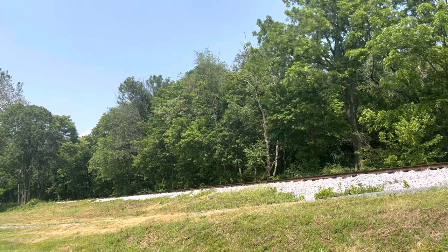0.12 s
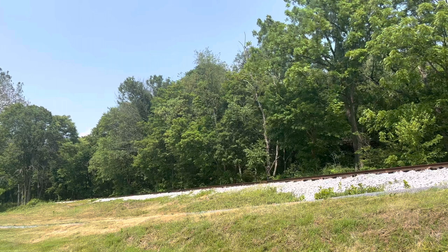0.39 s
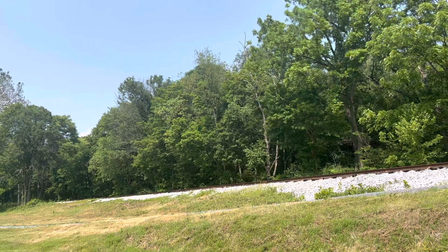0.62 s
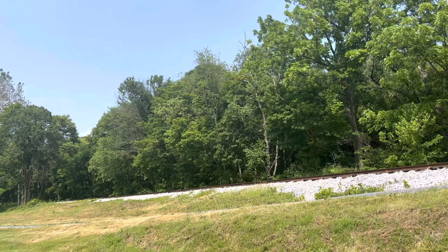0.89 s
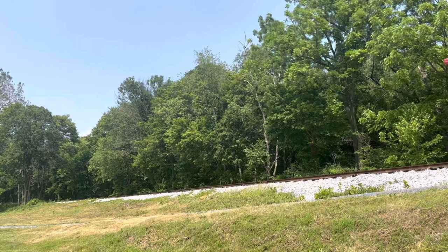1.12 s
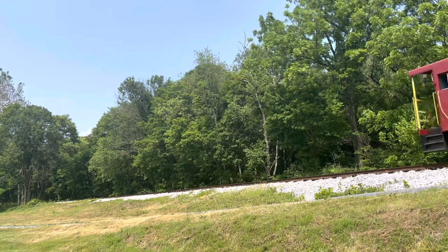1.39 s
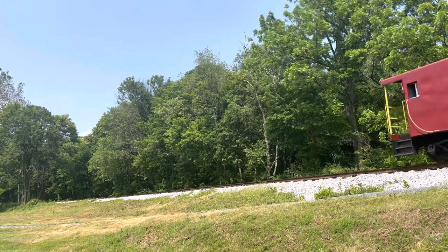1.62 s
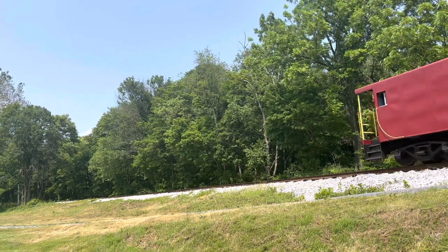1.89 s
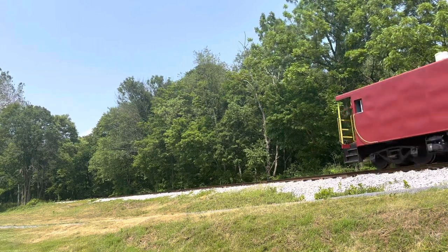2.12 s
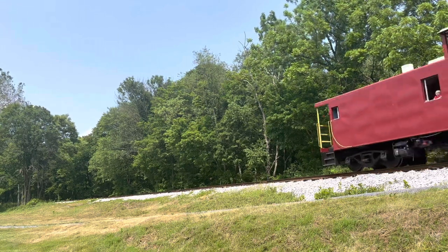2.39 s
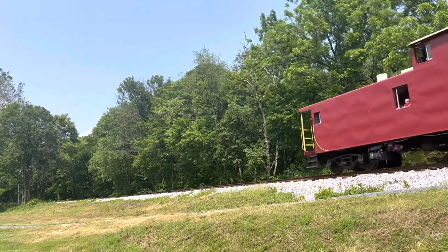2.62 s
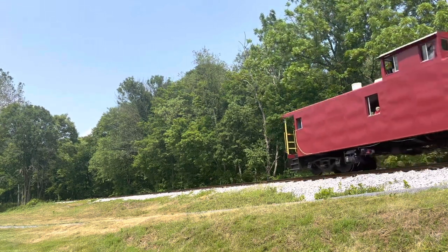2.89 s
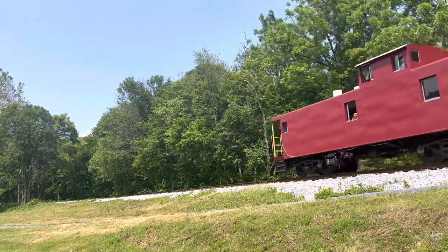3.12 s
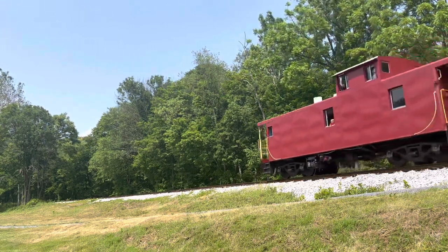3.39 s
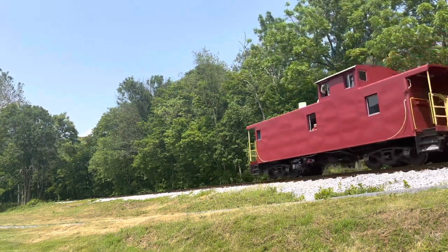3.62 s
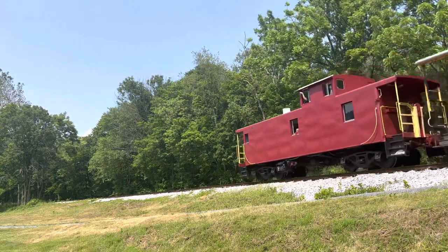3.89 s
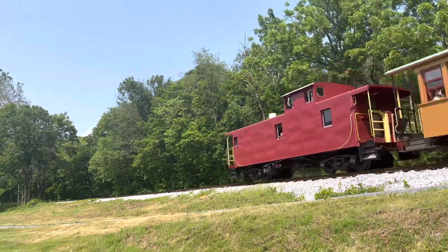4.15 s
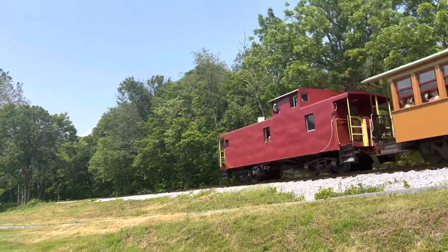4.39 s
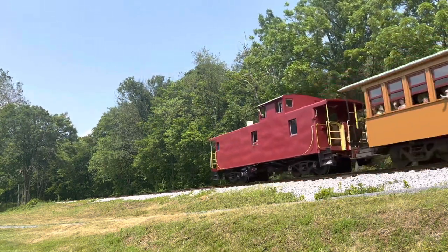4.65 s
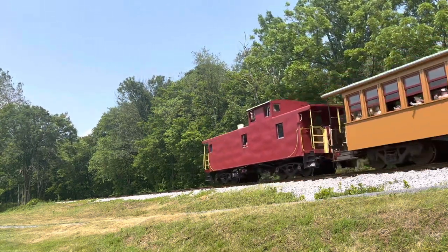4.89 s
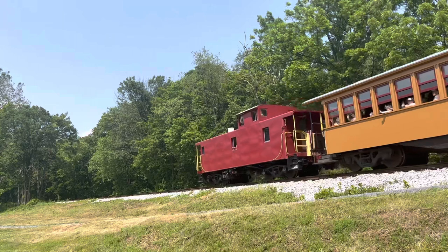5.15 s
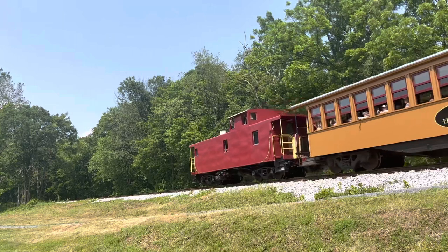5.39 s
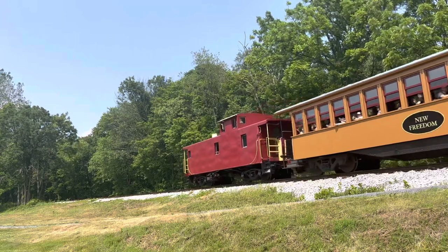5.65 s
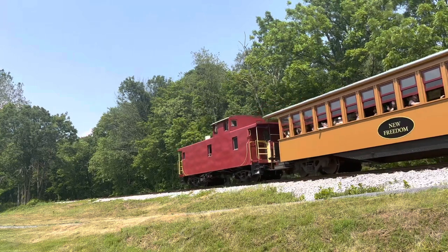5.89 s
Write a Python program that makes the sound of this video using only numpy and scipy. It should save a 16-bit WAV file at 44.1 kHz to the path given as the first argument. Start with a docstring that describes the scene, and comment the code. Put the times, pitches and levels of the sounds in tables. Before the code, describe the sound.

A slow train of wooden cars passes in an open field, captured by two spaced microphones with little echo. From the start there is deep rumble, a hollow body drone and grainy rail hiss, surging roughly every half second and gradually growing. Clacks with brief metallic clatter fall at about 0.2, 0.5, 1.3-1.4, 1.7, 2.2, 2.7, 3.1, 3.5, 3.9, 4.3, 4.7, 5.1, 5.4 and 5.8 s, ringing the wheels. Dull slack-gear thuds come at 0.5, cluster between 2.6 and 4.2, and return near 5 s. Loose parts clink throughout. Short wavering steel squeaks chirp around 1.8, 2.4, 4.3 and 4.8 s, with longer faint ones after 5.4. A thin throbbing squeal near 4.5 kHz, mostly left, is faint at first, rises after 2.7, is strongest around 3.6-5.2, dips near 5.3, then returns unsteadily. The rolling continues to the end at 6 s.

```python
"""Wheels and car bodies rumble as a short train of wooden cars rolls slowly past on jointed track.
Rolling is shaped noise with surges; rail joints excite damped clacks, noise clatter and wheel modes.
Slack gear thuds as noise-driven resonances, rubbing steel squeaks in wavering tones, loose parts clink.
A thin throbbing squeal, a tone with fainter tones above it, hangs on the left in a band of hiss.
Two spaced microphones in an open field hear the train from the right."""
import sys
import numpy as np
from scipy import signal
from scipy.fft import rfft, irfft, next_fast_len
from scipy.io import wavfile

SR = 44100
rng = np.random.default_rng(int(sys.argv[2]) if len(sys.argv) > 2 else 0)


def log_audio(samples):
    """Write samples as a 16-bit WAV file to the path given in sys.argv[1]."""
    # one column per channel
    frames = np.atleast_2d(samples).T
    # limit to full scale, then quantise
    limited = np.clip(frames, -1, 1)
    pcm = np.round(limited * 32767).astype(np.int16)
    wavfile.write(sys.argv[1], SR, pcm)


def convert_level_to_amplitude(level_db):
    """Map a level in decibels to its linear amplitude factor."""
    exponent = np.asarray(level_db, float) / 20
    return 10 ** exponent


N = 265482  # samples


def columns(rows):
    """Table columns as arrays."""
    return np.transpose(np.array(rows, float))


def in_time(rows):
    """Linear interpolation of a table's curves at every sample."""
    s, *curves = columns(rows)
    return [np.interp(np.arange(N) / SR, s, curve) for curve in curves]


def at_hz(points, hz):
    """A spectrum interpolated on a log-frequency axis."""
    point_hz, value = columns(points)
    return np.interp(np.log(hz), np.log(point_hz), value)


def rms_one(x):
    """Normalisation to unit rms."""
    return x / np.sqrt(np.mean(x ** 2) + 1e-20)


def drift(rate_hz):
    """Low-pass random process of unit rms: noise through a double pole, drawn every 40 samples."""
    r = np.exp(-80 * np.pi * rate_hz / SR)
    white = rng.standard_normal(N // 40 + 2002)
    slow = signal.lfilter([1], [1, -2 * r, r * r], white)[2000:]   # the filter has settled
    return np.interp(np.arange(N) / 40, np.arange(len(slow)), rms_one(slow))


def ring(force, hz, t60_s):
    """Damped resonator: a unit impulse starts a decaying sine of initial height about 1."""
    r = convert_level_to_amplitude(-60 / (t60_s * SR))
    w = 2 * np.pi * hz / SR
    return signal.lfilter([0, np.sin(w)], [1, -2 * r * np.cos(w), r * r], force + 1e-18)


def third_octaves():
    """Third-octave filtering of white noise, two unrelated draws: direct path and scattered paths."""
    edges = 22 * 2 ** (np.arange(30) / 3)
    white = rng.standard_normal((2, 2, N))
    for k, (low, high) in enumerate(zip(edges, edges[1:])):
        sos = signal.butter(2, [low, high], "band", fs=SR, output="sos")
        yield np.sqrt(low * high), signal.sosfilt(sos, white[k % 2])   # neighbours use unlike noise


# rumble surges, about once per wheel turn, as from a tread out of round:
# peak_s, deep_rumble_rise_db, body_drone_rise_db
SURGES = [(0.03, 4.5, -0.5), (0.58, 7, 9), (1.13, 9, 5), (1.73, 7, 2.5), (2.28, 8.5, 8.5), (2.9, 5, 7),
          (3.1, 3.5, 3), (3.54, 4.5, 8.5), (4.14, 5.5, 2), (4.82, 4.5, 4.5), (5.46, 3, 5), (5.72, 0.5, 0)]
SURGE_RISE_S, SURGE_FALL_S = 0.13, 0.2


def surges(rises_db, late_s):
    """Periodic excitation by an uneven tread: each level surge is a skewed Gaussian, slower to ebb."""
    age = np.arange(N) / SR - columns(SURGES)[0][:, None] - late_s
    width_s = np.where(age < 0, SURGE_RISE_S, SURGE_FALL_S)
    return rises_db @ np.exp(-(age / width_s) ** 2)


# rolling levels before the surges, louder as the cars draw level: time_s, body_drone_db, rail_hiss_db
ROLLING_LEVELS = [(0.0, -28, -38.5), (0.35, -32, -42), (0.67, -37.5, -40.5), (0.87, -33, -41),
                  (1.76, -27, -39.5), (2.09, -28.5, -40), (2.33, -32, -39), (2.67, -27, -37),
                  (2.84, -34.5, -38.5), (2.89, -30, -37.5), (3.02, -30, -38), (3.27, -31, -39.5),
                  (3.74, -29, -36.5), (4.31, -25.5, -34), (4.51, -28.5, -34.5), (4.65, -29.5, -37.5),
                  (5.08, -25, -35.5), (5.2, -22.5, -36), (5.29, -29, -37), (5.4, -27.5, -35.5),
                  (6.02, -26.5, -35)]
DEEP_START_DB, DEEP_GROWTH_DB_PER_S = -32, 1.01   # deep rumble between surges
DEEP_LATE_S = 0.013     # the deep surge follows the drone's
HISS_FOLLOWS = 0.24     # share of the drone's surge, in dB, that the hiss takes


def rolling_db():
    """Common excitation: rumble, drone and hiss levels in dB share the timing of the surges."""
    body_db, hiss_db = in_time(ROLLING_LEVELS)
    _, deep_rise_db, body_rise_db = columns(SURGES)
    body_surge_db = surges(body_rise_db, 0)
    deep_db = DEEP_START_DB + DEEP_GROWTH_DB_PER_S * np.arange(N) / SR + surges(deep_rise_db, DEEP_LATE_S)
    return deep_db, body_db + body_surge_db, hiss_db + HISS_FOLLOWS * body_surge_db


# rolling noise spectrum, relative within each part: frequency_hz, density_db (per Hz)
ROLLING_SPECTRUM = [(25, -32), (45, -2), (60, -4), (120, -7.5), (300, -2), (450, -11), (700, -14.5),
                    (1050, -13), (1400, -22), (2200, -18.5), (2800, -22), (3500, -24), (4500, -23),
                    (5600, -28.5), (6800, -33.5), (8200, -45), (12000, -46), (15000, -76)]
# grind of wheel on rail: time_s, finest_hiss_db, rail_hiss_brightness_db_per_octave
GRIND = [(0.0, -62, 2), (0.47, -65, 2), (1.41, -61, 1), (2.33, -61.5, 0.5), (3.0, -59.5, 1.5),
         (3.4, -62, 1), (3.66, -59, 1), (4.21, -57, 0), (4.81, -63.5, 1), (5.78, -57.5, 1),
         (6.02, -51.5, 4)]


def rolling(bands, deep_db, body_db, hiss_db):
    """Roughness excitation: deep rumble, body drone, rail hiss and finest hiss, as wavering noise bands."""
    parts = np.zeros((4, 2, N))
    finest_db, bright_db = in_time(GRIND)
    for hz, noise in bands:
        part = np.searchsorted([150, 575, 8000], hz)   # limits between the four parts, Hz
        tilt_db = bright_db * np.log2(hz / 2000) * (part == 2)
        waver_db = (1.4 if part > 1 else 1.0) * drift(5.8)   # each band swells alone
        parts[part] += noise * convert_level_to_amplitude(at_hz(ROLLING_SPECTRUM, hz) + tilt_db + waver_db)
    levels_db = [deep_db, body_db, hiss_db, finest_db]
    return sum(convert_level_to_amplitude(db) * rms_one(part) for db, part in zip(levels_db, parts))


# wheel and rail modes: pitch_hz (before tuning), relative_level_db, t60_s
WHEEL_MODES = [(960, -13, 0.24), (1150, -2, 0.072), (1618, 4.5, 0.021), (1690, -5, 0.095),
               (2000, -9, 0.056), (2140, -2, 0.041), (2400, -14.5, 0.1), (2680, -5, 0.12),
               (3000, -32, 0.056), (3040, -9, 0.035), (4150, -12, 0.06), (6220, -10, 0.05)]


def wheels(shaking, tuning, rattles_per_s=500.0, ring_db=-20.5, swell_db=3.5):
    """Modal synthesis: random impulses excite the wheel's damped modes, each swelling on its own."""
    hits = rng.random((2, N)) < rattles_per_s / SR
    rattles = hits * rng.standard_normal((2, N)) * shaking
    out = np.zeros((2, N))
    for hz, db, t60_s in WHEEL_MODES:
        level_db = db + ring_db + swell_db * drift(13.0)
        out += ring(rattles * convert_level_to_amplitude(level_db), tuning * hz, t60_s)
    return out


# wheels over rail joints:
# start_s, clatter_level_db (relative), treble_db_per_octave, first_clack_db, clack_pitch_hz
JOINTS = [(0.168, -16, -5.5, -25, 1090), (0.416, -31, -11, -31, 890), (0.533, -17.5, -11, -30, 975),
          (1.293, -17, -4.5, -25, 884), (1.402, -16, -6.5, -20.5, 960), (1.437, -32, -6, -25, 910),
          (1.664, -11.5, -3.5, -30, 1690), (1.697, -26, -6, -34, 1000), (1.725, -32, -3, -42, 1050),
          (1.784, -23, -12, -22.5, 990), (2.194, -24, -7, -32, 960), (2.702, -11, -4, -30, 1630),
          (3.084, -10.5, -5, -20.5, 800), (3.471, -18.5, -3, -18.5, 960), (3.864, -21, -14, -23, 890),
          (3.907, -18, -3.5, -26, 1710), (3.988, -21, -13, -22.5, 1250), (4.293, -11, -2.5, -27, 1690),
          (4.393, -12.5, -7, -28, 855), (4.711, -26, 2, -19.5, 870), (5.093, -21, -6, -27, 900),
          (5.384, -13, -3, -29, 1060), (5.791, -10, -3.5, -32, 1740)]
# the joint crossed in each of those rows: far right, near right or straight ahead
CROSSED = "far far far near far far near near near far near near near far far ahead far ahead far far far ahead ahead".split()
# how each joint is struck: rise_time_constant_s, clatter_hold_s, wheel_pitch_factor
STRUCK = {"far": (.0008, .018, 1), "near": (.0008, .013, .985), "ahead": (.007, .027, 1.01)}
# clatter spectrum: frequency_hz, relative_density_db (per Hz)
CLATTER_SPECTRUM = [(70, -24), (200, -6), (500, -9.5), (1000, -17.5), (2000, -11), (3500, -12), (6500, -18),
                    (8200, -33), (12000, -11.5), (15000, -59)]
# clatter decay: frequency_hz, t60_s
CLATTER_DECAY = [(300, 0.12), (2000, 0.18), (6000, 0.1), (12000, 0.16)]
# partials of a clack: pitch_ratio, t60_s
CLACK_PARTIALS = [(1, .03), (1.346, .02), (1.626, .02), (1.95, .015), (0.581, .04)]
BOUNCE_MEAN_S, BOUNCE_LOSS_DB = 0.006, 5   # the tread strikes three times, unevenly
FRONT_DB, FRONT_S = 4.5, .003   # a hard blow starts with a crack: boost and its time constant
TILT_FROM_HZ = 600   # the treble slope is held constant below this


def joints(bands, noise_db=1.5):
    """Impact excitation: damped clacks, then clatter decaying band by band, ring the wheel; a track a joint."""
    out = {joint: np.zeros((2, N)) for joint in STRUCK}
    shaking = {joint: np.zeros(N) for joint in STRUCK}
    t = np.arange(N) / SR
    colour_db = rng.normal(0, 1.8, (len(JOINTS), len(bands)))   # every wheel sounds a little different
    gaps_s = BOUNCE_MEAN_S * rng.uniform(.6, 1.4, (len(JOINTS), 3))
    grain_db = [3.5 * drift(170.0) for _ in range(3)]
    for row, joint, tints_db, gap_s in zip(JOINTS, CROSSED, colour_db, gaps_s):
        s, db, treble_db, clack_db, clack_hz = row
        rise_s, hold_s, _ = STRUCK[joint]
        at = slice(int(s * SR), int((s + .3) * SR))
        age = t[at] - t[at][0]
        rise = (1 - np.exp(-age / rise_s)) * convert_level_to_amplitude(FRONT_DB * np.exp(-age / FRONT_S))
        after = np.maximum(age - hold_s, 0)
        shaking[joint][at] += convert_level_to_amplitude(db) * rise * np.exp(-after / .006)
        for ratio, t60_s in CLACK_PARTIALS:   # the tread meets the rail end
            for k, late_s in enumerate(np.cumsum(gap_s) - gap_s[0]):
                since = np.maximum(age - late_s, 0)
                envelope = (1 - np.exp(-since / rise_s)) * convert_level_to_amplitude(-60 * since / t60_s)
                strike = envelope * np.sin(2 * np.pi * ratio * clack_hz * since)
                out[joint][:, at] += convert_level_to_amplitude(clack_db - BOUNCE_LOSS_DB * k) * strike
        for k, ((hz, noise), tint_db) in enumerate(zip(bands, tints_db)):
            tilt_db = treble_db * np.log2(max(hz, TILT_FROM_HZ) / 1500)
            level_db = db + noise_db + at_hz(CLATTER_SPECTRUM, hz) + tint_db + tilt_db
            grainy_db = grain_db[k // 3 % 3][at]   # neighbouring octaves break up differently
            decay_db = -60 * after / at_hz(CLATTER_DECAY, hz)
            out[joint][:, at] += noise[:, at] * rise * convert_level_to_amplitude(level_db + grainy_db + decay_db)
    for joint, (_, _, tuning) in STRUCK.items():
        out[joint] += wheels(shaking[joint], tuning, rattles_per_s=1500.0, ring_db=-30.0)
    return out


# slack couplers and trucks thudding: start_s, level_db (relative), pitch_hz
THUDS = [(0.536, -22, 305), (2.584, -23.5, 400), (2.868, -24, 279), (2.972, -22.5, 198),
         (3.388, -27.5, 406), (3.545, -24, 240), (3.774, -26.5, 389), (4.16, -25, 220), (4.953, -26, 470),
         (5.338, -25.5, 393)]


def thuds(t60_s=0.077, push_s=0.031):
    """Forced resonance: a short noisy push drives a low body mode and a weaker one above it."""
    out = np.zeros((2, N))
    age = np.arange(int(0.013 * SR)) / SR
    pushes = rng.standard_normal((len(THUDS), 2, len(age)))
    for (s, db, hz), push in zip(THUDS, pushes):
        force, i = np.zeros((2, int(.3 * SR))), int(s * SR)
        force[:, :len(age)] = push * np.exp(-age / push_s)
        thud = ring(force, hz, t60_s) + 0.5 * ring(force, 1.277 * hz, 2.0 * t60_s)
        peak = np.abs(thud).max(axis=1, keepdims=True)
        out[:, i:i + force.shape[1]] += convert_level_to_amplitude(db + 10.5) * thud / peak
    return out


# squeaks of rubbing steel:
# start_s, level_db (before flutter), pitch_hz (before wavering), length_s, second_harmonic_db (to the first)
SQUEAKS = [(0.328, -52.5, 2640, 0.2, -28), (0.77, -50, 3290, .08, -30), (0.54, -47, 5400, 0.073, -27),
           (1.72, -43, 1900, 0.081, -28), (1.8, -46, 3610, 0.029, -30), (1.802, -33.5, 1737, 0.038, -17),
           (1.953, -48, 3620, 0.046, -21), (1.98, -46, 1650, 0.049, -28), (2.15, -40, 1845, 0.033, -37),
           (2.22, -43.5, 1460, 0.068, -37), (2.27, -46, 3170, 0.054, -30), (2.305, -39.5, 2100, .04, -30),
           (2.372, -51, 2400, .03, -28), (2.428, -33.5, 2373, 0.096, -3.5), (2.47, -35, 2150, 0.043, -6),
           (3.605, -42.5, 3800, 0.045, -30), (3.915, -39, 2670, 0.039, -30), (4.314, -34, 2990, 0.053, -32),
           (4.34, -37, 2700, 0.053, -30), (4.57, -40, 1840, 0.08, 0), (4.755, -40, 2080, 0.11, -32),
           (4.82, -35.5, 1860, 0.042, -13), (4.75, -31.5, 1117, 0.041, -28), (5.22, -42, 2520, 0.027, -32),
           (5.39, -50, 6780, 0.13, -23), (5.429, -41, 2680, 0.12, -30), (5.5, -47, 2440, 0.22, -30),
           (5.647, -49, 7140, 0.29, -28), (5.827, -38, 2760, 0.072, -24)]
SQUEAK_WAVER = 0.007   # rms share of the pitch


def squeaks(joint, flutter_db=3.2, rasp=.45):
    """Stick-slip friction: tones of fast-wavering pitch and strength, from the truck last over this joint."""
    out, t = np.zeros((2, N)), np.arange(N) / SR
    wander = drift(130.0)
    flutter = convert_level_to_amplitude(flutter_db * drift(70.0)) * (1 + rasp * drift(300.0))
    joint_s = columns(JOINTS)[0]
    for s, db, hz, length_s, second_db in SQUEAKS:
        if CROSSED[np.searchsorted(joint_s, s) - 1] != joint:
            continue
        at = slice(int(s * SR), int((s + length_s) * SR))
        phase = 2 * np.pi * hz * np.cumsum(1 + SQUEAK_WAVER * wander[at]) / SR
        swell = np.sin(np.pi * np.clip((t[at] - s) / length_s, 0, 1) ** 0.6) ** 0.4
        tone = np.sin(phase) + convert_level_to_amplitude(second_db) * np.sin(2 * phase)
        out[:, at] += convert_level_to_amplitude(db) * swell * flutter[at] * tone
    return out


def loose_gear(hiss_db):
    """Sustained modal excitation: loose gear never rests, and its rattling follows the rail hiss."""
    return wheels(convert_level_to_amplitude(hiss_db + 0.5 + 3.7 * drift(28.0)), 1)


def rattle(hiss_db, per_s=260.0, below_hiss_db=2.0, cycles=65.0):
    """Random impacts in clumps: small loose parts clink, each a damped resonance losing 60 dB in 65 cycles."""
    strengths_db = 4.0 * np.minimum(rng.exponential(1, (2, N)), 3.3)
    sizes = convert_level_to_amplitude(strengths_db) * rng.choice([-1, 1], (2, N))
    struck = rng.random((2, N)) < per_s * convert_level_to_amplitude(5.0 * drift(6.0)) / SR
    pitches_hz = np.geomspace(750, 3100, 30) * rng.uniform(.97, 1.03, 30)
    dealt = rng.integers(0, 30, N)   # which pitch a clink takes
    clinks = np.zeros((2, N))
    for k, hz in enumerate(pitches_hz):
        clinks += ring(sizes * struck * (dealt == k), hz, cycles / hz) * (1500 / hz)
    return convert_level_to_amplitude(hiss_db - below_hiss_db) * rms_one(clinks)


# the thin squeal: time_s, level_db (before flutter and panning)
SQUEAL_LEVELS = [(0, -56), (.38, -52), (.45, -47), (.65, -46), (.86, -52), (.92, -45), (1.1, -47),
                 (1.35, -45), (1.43, -54), (2.1, -56), (2.2, -46), (2.45, -42), (2.65, -44), (2.75, -39),
                 (2.95, -39), (3.15, -36), (3.33, -43), (3.39, -38), (3.52, -38), (3.6, -33), (3.85, -31.5),
                 (4.05, -32), (4.1, -38), (4.22, -37), (4.28, -44), (4.5, -39), (4.62, -33), (4.8, -31.5),
                 (4.93, -36), (5, -31.5), (5.13, -31), (5.18, -35), (5.28, -37), (5.34, -46), (5.5, -42),
                 (5.6, -33.5), (5.75, -36.5), (5.86, -44), (5.95, -38), (6.02, -35)]
# squeal in the stereo pair: time_s, left_lag_radians
SQUEAL_LAG = [(0, .5), (1.8, .8), (2.8, 2.2), (6.02, 3.4)]
# fainter tones above the squeal: throb_rate_multiple, level_db (to the main tone)
THROB_TONES = [(1, -16), (2, -13), (4, -19)]
SQUEAL_HZ, THROB_HZ, RIGHT_BELOW_LEFT_DB = 4533.5, 62.8, 11.5


def squeal(waver_hz=1.5, flutter_db=1.3):
    """Beating: a nearly pure tone throbs against fainter tones above it, much stronger on the left."""
    phase = 2 * np.pi * np.cumsum(SQUEAL_HZ + waver_hz * drift(10.8)) / SR
    beat = 2 * np.pi * np.cumsum(THROB_HZ + 0.98 * drift(0.735)) / SR
    sides = np.array([phase - in_time(SQUEAL_LAG)[0], phase])
    tone = np.sin(sides) + sum(convert_level_to_amplitude(db) * np.sin(sides + k * beat) for k, db in THROB_TONES)
    level = convert_level_to_amplitude(in_time(SQUEAL_LEVELS)[0] + flutter_db * drift(25.0))
    return level * tone * convert_level_to_amplitude(np.array([[0], [-RIGHT_BELOW_LEFT_DB]]))


HALO_HZ, HALO_POLE_WIDTH_HZ, HALO_MEAN_DB = 4570, 510, -49.5
HALO_FOLLOWS = 0.88   # share of the rail hiss's swing, in dB


def halo(hiss_db, flutter_db=3.5):
    """Resonant filtering: noise twice through one resonance gives a flickering hiss about the squeal's pitch."""
    t60_s = np.log(1000) / (np.pi * HALO_POLE_WIDTH_HZ)
    once = ring(rng.standard_normal((2, N)), HALO_HZ, t60_s)
    band = ring(once, HALO_HZ, t60_s)
    swing_db = HALO_FOLLOWS * (hiss_db - hiss_db.mean())
    return convert_level_to_amplitude(HALO_MEAN_DB + swing_db + flutter_db * drift(6.2)) * rms_one(band)


def stereo_pair(paths, image):
    """Interchannel coherence: the left is the right's direct path, phase-lagged, weighted and mixed with scatter."""
    size = next_fast_len(N + 4096)
    hz, *curves = columns(image)
    bins_hz = np.arange(size // 2 + 1) * SR / size
    lag, alike, pan_db = [np.interp(bins_hz, hz, curve) for curve in curves]
    alike = np.clip(alike, 0, 1)
    direct, scattered = rfft(paths, size)
    left = alike * direct * np.exp(-1j * lag) + np.sqrt(1 - alike ** 2) * scattered
    pair = np.array([left * convert_level_to_amplitude(pan_db / 2), direct * convert_level_to_amplitude(-pan_db / 2)])
    return irfft(pair, size)[:, :N]


# the train in the stereo pair, spaced-microphone lag below about 7 kHz, a stepped treble phase above:
# frequency_hz, left_lag_radians, likeness (0-1), left_minus_right_db
TRAIN_IMAGE = [(0, 0, .995, 1.3), (250, 1.1, .97, 0), (520, 2.4, .92, -1), (660, 3.1, .85, -3.5),
               (800, 3.3, .72, -6), (1120, 2.4, .65, -5), (1400, 2.9, .7, -5), (2000, 6.5, .5, -3),
               (3400, 5, .25, 0), (4900, 11, .25, 3), (6500, 7.2, .5, -4), (7200, 9.2, .3, -2),
               (7600, 9.42, .92, 0), (8600, 9.42, .85, 0), (9000, 10.6, .4, 0), (10300, 11.5, .5, 0),
               (10900, 12.57, .98, 0), (13200, 12.57, .95, 0), (13700, 14, .5, 0), (14400, 15.5, .7, 0),
               (16000, 15.7, .9, 0)]
# each joint in the stereo pair, microphone lag below, a stepped treble phase in the top rows:
# frequency_hz, left_lag_radians, likeness (0-1), left_minus_right_db
JOINT_IMAGES = { "far": [(0, 0, 1, 1), (600, 2.9, .93, 0), (840, 3.2, .93, -5), (1200, 2.8, .93, -5),
                (1700, 3.3, .85, -6), (2400, 5.9, .7, -5), (4700, 8, .15, 0), (8700, 10, .6, -1),
                (11000, 12.5, .9, 0), (13000, 12.6, .9, 0), (14400, 15.7, .9, 0)], "near": [(0, 0, 1, 1),
                (600, 2.3, .9, -1.5), (840, 2.5, .5, -11), (1200, 2.1, .7, -8), (1700, 1.2, .7, -7.5),
                (2400, 2.3, .65, 0), (3350, 3.4, .85, -1), (6400, 7.6, .3, -2), (11000, 12.3, .85, 0),
                (13000, 12.6, .9, 0), (14400, 15.7, .9, 0)], "ahead": [(0, 0, 1, 1), (390, .6, .93, -1.5),
                (840, -1.2, .8, -6), (1200, .2, .8, -2), (1700, -.5, .9, -4), (2400, -.4, .95, -1),
                (4700, .2, .5, -1), (6400, 2.1, .5, -5), (11000, 6.2, .9, 0), (13000, 6.3, .9, 0),
                (14400, 9.4, .9, 0)]}


def scene():
    """Superposition: the train and each joint enter the stereo pair with an image of their own."""
    bands = list(third_octaves())
    deep_db, body_db, hiss_db = rolling_db()
    train = rolling(bands, deep_db, body_db, hiss_db) + loose_gear(hiss_db)
    train += rattle(hiss_db) + thuds() + halo(hiss_db)
    mix = stereo_pair(train, TRAIN_IMAGE) + squeal()
    for joint, track in joints(bands).items():
        mix += stereo_pair(track + squeaks(joint), JOINT_IMAGES[joint])
    return mix


def band_limit(x):
    """A steep low-pass at the top of the band."""
    return signal.sosfilt(signal.butter(12, 15710, fs=SR, output="sos"), x)


def record(dry):
    """High-pass response: the microphones lose the deepest bass."""
    high_pass = signal.butter(2, 38.0, "high", fs=SR, output="sos")
    mix = signal.sosfilt(high_pass, dry)
    return band_limit(mix)


dry = scene()
out = record(dry)
log_audio(out)
```